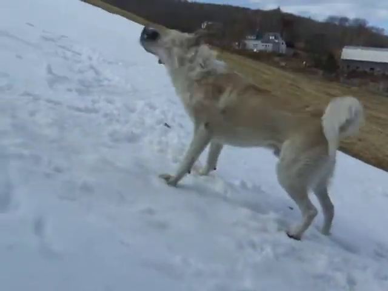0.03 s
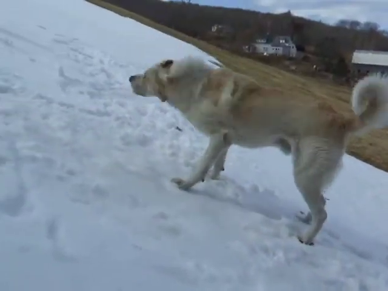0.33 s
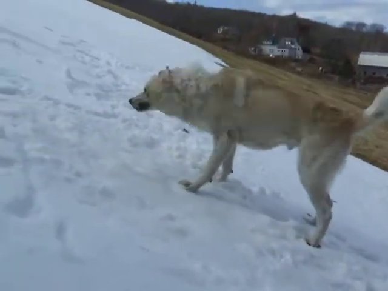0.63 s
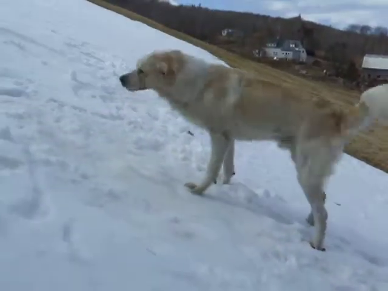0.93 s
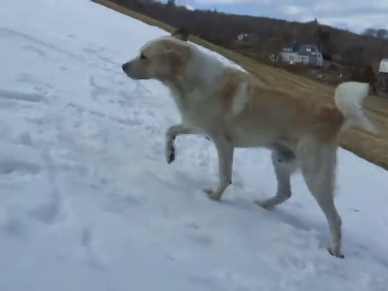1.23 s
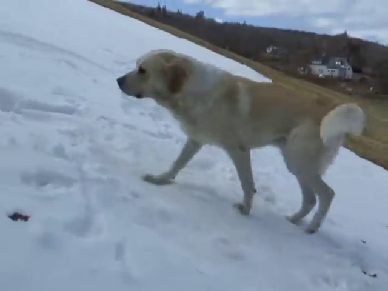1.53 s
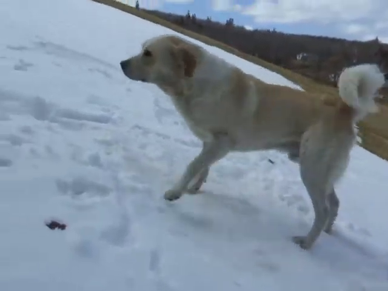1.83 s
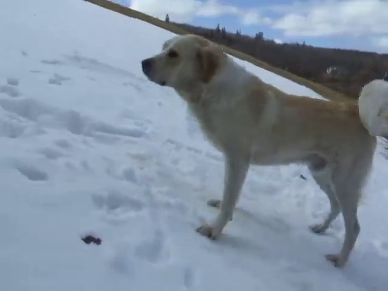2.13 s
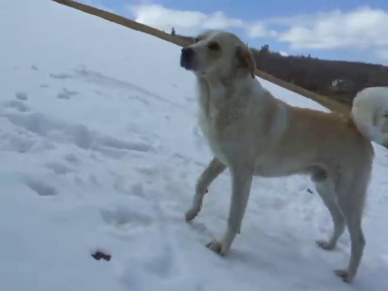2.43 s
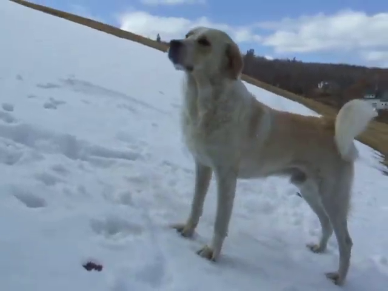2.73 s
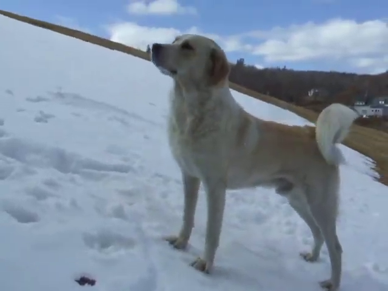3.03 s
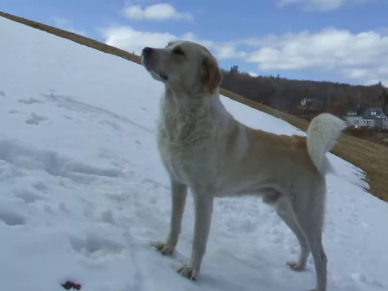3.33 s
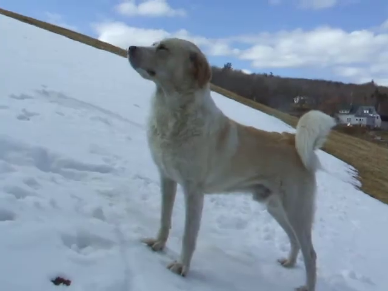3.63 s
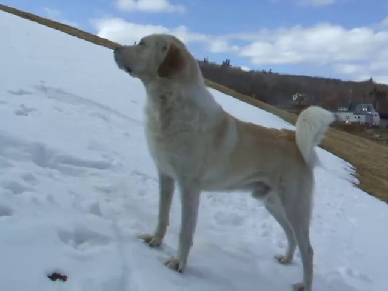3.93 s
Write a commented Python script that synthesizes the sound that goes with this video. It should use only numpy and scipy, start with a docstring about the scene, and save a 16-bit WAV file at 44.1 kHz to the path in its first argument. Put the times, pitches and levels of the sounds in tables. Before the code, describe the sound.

A dog's paws crunch on crusty snow while wind buffets the microphone.

```python
"""A dog on crusty snow

A dog shifts about on crusty snow a couple of metres away, then stands still.
Each paw breaks or scrapes the crust in a short spray of icy grains; single bits of crust snap.
Wind buffets the microphone, dies away and returns in one small puff, over a faint hiss."""
import sys
import numpy as np
from scipy import signal
from scipy.fft import rfft, irfft
from scipy.io import wavfile

SR = 44100
rng = np.random.default_rng(int(sys.argv[2]) if len(sys.argv) > 2 else 0)


def wav_record(signal):
    """Record a signal, one row per channel, as 16-bit PCM in the file named by sys.argv[1]."""
    frames = np.transpose(np.atleast_2d(signal))
    bounded = np.clip(frames, -1, 1)
    # unit amplitude maps onto the largest positive 16-bit level
    quanta = np.round(bounded * 32767).astype(np.int16)
    wavfile.write(sys.argv[1], SR, quanta)


N = 176400

# Tone of the steady hiss: frequency_hz, relative_db
HISS_TONE = [(30, 8), (150, 7), (500, 1.5), (1000, -1), (1500, -2), (2200, -5), (3500, -8), (5500, -8),
             (7400, -7.5), (8000, -3.5), (8300, -11), (8700, -28)]
# Tone of the bass rumble: frequency_hz, relative_db
RUMBLE_TONE = [(12, -6), (30, 0), (55, -3), (100, -5), (300, -45), (1000, -90)]
# Loudness of the rumble: time_s, level_db
RUMBLE_LEVELS = [(0, -37), (2.3, -39), (2.7, -43.5), (3.1, -52), (3.4, -49), (3.6, -41), (4, -45)]
# Basic tone of the wind: frequency_hz, relative_db
WIND_TONE = [(20, -10), (40, -3), (70, -1.5), (125, .6), (240, -3), (400, -8.2), (620, -15.4),
             (1000, -23.2), (1500, -32.3), (2100, -41)]
# Strength of the wind: time_s, level_db
GUSTS = [(0, -19), (.14, -17.5), (.3, -18), (.52, -19.5), (.74, -17.3), (.93, -17.3), (1.08, -20.5),
         (1.33, -21.5), (1.41, -18.5), (1.6, -20), (1.86, -23), (1.99, -27), (2.11, -26.8), (2.22, -30),
         (2.32, -29.8), (2.42, -35.5), (2.7, -41), (3.03, -49), (3.25, -46), (3.42, -47), (3.54, -41),
         (3.622, -43), (3.648, -29.5), (3.75, -37.5), (4, -42)]
# How bright the wind is above 300 Hz: time_s, tilt_db_per_octave
WIND_BRIGHTNESS = [(0, 1.3), (.35, 1.2), (.55, -.1), (.88, 1.3), (1.15, .3), (1.4, -.7), (1.6, -.1),
                   (1.9, -1.6), (2.15, -3.6), (2.6, -4.2), (3.66, -4), (4, -5)]
# Single bumps and lulls of wind: middle_s, half_width_s, extra_db
WIND_BUFFETS = [(.146, .006, 3.5), (.312, .012, 2.5), (.342, .012, -4), (.376, .013, 4.5), (.742, .010, 3),
                (1.323, .003, 5), (1.534, .003, 4), (1.651, .004, 3), (1.859, .006, 6), (2.382, .008, 6),
                (2.50, .012, 5)]
# Ring of the ice grains: frequency_hz, relative_db
ICE_TONE = [(500, -22), (1500, -13), (2300, -10), (3200, -6.5), (4500, -7), (5600, -4), (6700, .7),
            (7700, -1.5), (8200, -6), (8700, -12)]
# Bits of crust snapping: start_s, level_db, pitch_hz, fade_s (time to fall 20 dB)
CRUST_SNAPS = [ (.0615, -25, 7400, .006), (.0625, -33, 5100, .005), (.071, -33, 7500, .005),
               (.077, -29.5, 7700, .008), (.078, -36, 3500, .008), (.269, -36, 6000, .004),
               (.435, -38, 7300, .006), (.438, -43, 4500, .005), (.446, -42, 7300, .003),
               (.460, -42, 7800, .003), (.528, -37, 6500, .004), (.608, -43, 6200, .003),
               (.630, -33, 6500, .007), (.631, -37, 4400, .007), (.650, -40, 7200, .004),
               (.655, -42, 7500, .003), (.726, -41, 7000, .006), (.820, -39, 6800, .003),
               (2.334, -34, 1500, .009), (2.3345, -41, 2900, .007), (2.767, -38, 7800, .004),
               (3.082, -42, 2900, .006)]
# Paws crushing the crust: start_s, rise_s, hold_s, fade_s (time to fall 20 dB), level_db, body_extra_db
PAW_STEPS = [ (.148, .008, .040, .02, -50, 0), (.244, .003, .005, .016, -36, -3),
             (.288, .014, .006, .022, -37, -2), (.336, .006, .026, .022, -44, -2),
             (1.170, .005, .012, .014, -42, -2), (1.198, .004, .005, .040, -36, -1),
             (1.233, .003, .010, .014, -36, 2), (1.400, .003, .005, .025, -35, -6),
             (1.420, .008, .010, .040, -40, -3), (1.458, .006, .003, .030, -39, 0),
             (1.599, .006, .002, .008, -29, -1), (1.620, .002, .002, .016, -44, 0),
             (1.673, .006, .012, .012, -35, -2), (1.710, .006, .011, .020, -33, -1),
             (1.927, .004, .018, .026, -38, -1), (1.981, .004, .008, .045, -44, -2),
             (2.055, .008, .002, .006, -37, 0), (2.246, .007, .003, .028, -37, 2),
             (2.476, .012, .010, .045, -39, -2), (2.526, .010, .003, .022, -40, 0)]
# Paws dragged over the crust: start_s, peak_s, end_s, peak_db, body_extra_db
PAW_DRAGS = [(.895, .992, 1.042, -30.5, 2), (2.135, 2.195, 2.235, -36.5, -1), (2.12, 2.32, 2.85, -45, -2)]

TIME_S = np.arange(N) / SR
FREQS_HZ = np.maximum(np.arange(N // 2 + 1) * SR / N, 1)


def gain(db):
    """Turn decibels into a multiplier."""
    return 10 ** (np.asarray(db) / 20)


def normalise(sound):
    """Scale a sound to an average power of 1."""
    return sound / np.sqrt(np.mean(sound ** 2) + 1e-20)


def over_time(table):
    """Join a table's points with straight lines, one value per sample."""
    return np.interp(TIME_S, *np.array(table).T)


def tone_gain(table, hz=FREQS_HZ):
    """Read a tone table as a multiplier for each frequency."""
    points_hz, points_db = np.array(table, float).T
    return gain(np.interp(np.log(hz), np.log(points_hz), points_db))


def colour(sound, gains):
    """Turn each frequency up or down, then normalise."""
    return normalise(irfft(rfft(sound) * gains, N))


def noise(gains):
    """Random noise with the given tone."""
    return colour(rng.standard_normal(N), gains)


def wander(cutoff_hz):
    """A smooth random wobble, mostly slower than the cutoff."""
    return noise(1 / (1 + (FREQS_HZ / cutoff_hz) ** 4))


def hiss(level_db=-51):
    """The open air and the microphone give a faint, steady hiss."""
    return gain(level_db) * noise(tone_gain(HISS_TONE))


def rumble():
    """Slow swings of air pressure linger when the gust has dropped."""
    return gain(over_time(RUMBLE_LEVELS)) * noise(tone_gain(RUMBLE_TONE))


def wind(edge_hz=2100, rolloff_db_per_octave=-23, trim_db=.2):
    """Air swirls at the microphone: bands of noise follow the gusts, and eddies shake them together."""
    buffets_db = sum(db * np.exp(-((TIME_S - middle) / width) ** 2) for middle, width, db in WIND_BUFFETS)
    tilt_db = over_time(WIND_BRIGHTNESS) + .25 * buffets_db  # bumps are brighter, lulls duller
    eddies, sway = wander(cutoff_hz=165), wander(cutoff_hz=35)
    sound, power = 0, 0
    for hz in 20 * 2 ** (np.arange(17) / 2):  # half an octave apart
        band = noise(np.cos(np.pi / 2 * np.clip(2 * np.log2(FREQS_HZ / hz), -1, 1)))
        strength = tone_gain(WIND_TONE, min(hz, edge_hz)) * np.sqrt(hz)  # higher bands are wider
        strength *= gain(rolloff_db_per_octave * max(np.log2(hz / edge_hz), 0))
        octaves_up = max(np.log2(hz / 300), 0)
        eddy_db = (1.9 + .85 * octaves_up) * eddies  # fast eddies shake the upper bands most
        shake = normalise(gain(eddy_db + .3 * sway))
        sound += band * shake * strength * gain(octaves_up * tilt_db)
        power += strength ** 2
    return sound / np.sqrt(power) * gain(over_time(GUSTS) + buffets_db + trim_db)


def snaps(rise_s=.0017, ring_width=.1, crack_db=-8, trim_db=-1.5):
    """A snapping bit of crust cracks and rings for a few milliseconds around its own pitch."""
    sound = np.zeros(N)
    crack = gain(crack_db) * noise(tone_gain(ICE_TONE))
    for start, db, pitch_hz, fade in CRUST_SNAPS:
        ring = noise(1 / (1 + (np.log(FREQS_HZ / pitch_hz) / ring_width) ** 2))
        age = TIME_S - start
        loudness = np.clip(age / rise_s, 0, 1) * gain(db - 20 * np.maximum(age - rise_s, 0) / fade)
        sound += loudness * (ring + crack)
    return gain(trim_db) * sound


def ice_grains(grains_per_s=1500, spread_db=3.3, powder_db=-1.5, split_hz=5000):
    """Many tiny breaks of uneven size and fine powder, split into a lower body and a high sparkle."""
    sizes = gain(spread_db * np.minimum(rng.exponential(size=N), 4))
    clicks = (rng.random(N) < grains_per_s / SR) * sizes * rng.choice([-1, 1], N)
    powder = gain(powder_db) * rng.standard_normal(N)
    ice = colour(normalise(clicks) + powder, tone_gain(ICE_TONE))
    body = irfft(rfft(ice) / (1 + (FREQS_HZ / split_hz) ** 8), N)
    return body, ice - body


def paws(drag_swell_db=22, trim_db=-.2):
    """Steps crush the crust in brief bursts; dragged paws make scrapes that swell and fade."""
    body, sparkle = ice_grains()
    body_power, sparkle_power = np.zeros(N), np.zeros(N)
    for start, rise, hold, fade, db, body_db in PAW_STEPS:
        age = TIME_S - start
        crunch = np.clip(age / rise, 0, 1) * gain(db - 20 * np.maximum(age - rise - hold, 0) / fade)
        body_power += (crunch * gain(body_db)) ** 2
        sparkle_power += crunch ** 2
    for start, peak, end, db, body_db in PAW_DRAGS:
        from_peak = np.maximum((peak - TIME_S) / (peak - start), (TIME_S - peak) / (end - peak))
        scrape = gain(db - drag_swell_db * from_peak ** 1.2)
        body_power += (scrape * gain(body_db)) ** 2
        sparkle_power += scrape ** 2
    return gain(trim_db) * (body * np.sqrt(body_power) + sparkle * np.sqrt(sparkle_power))


def scene():
    """Wind, snow sounds and hiss all reach one microphone."""
    return (wind() + rumble() + paws() + hiss() + snaps())[None]


def record(dry, top_hz=8650):
    """The small camera steeply cuts off the highest treble."""
    treble_cut = signal.firwin(161, top_hz, window=("kaiser", 8), fs=SR)
    return signal.fftconvolve(dry, treble_cut[None], mode="same")


dry = scene()
out = record(dry)
wav_record(out)
```